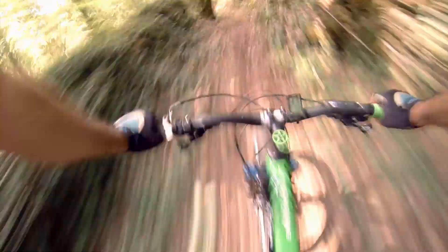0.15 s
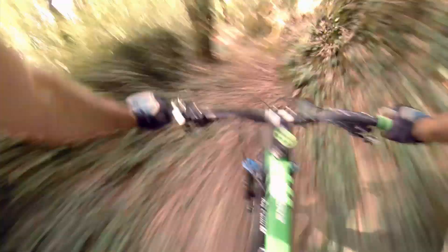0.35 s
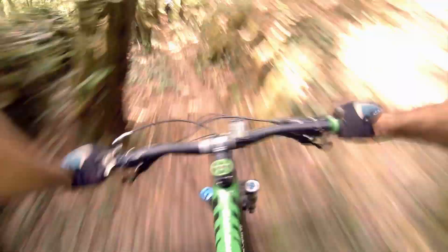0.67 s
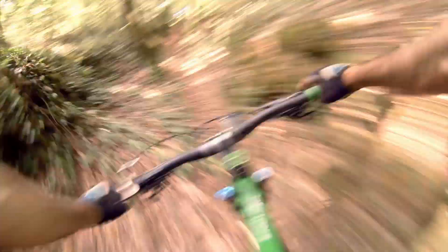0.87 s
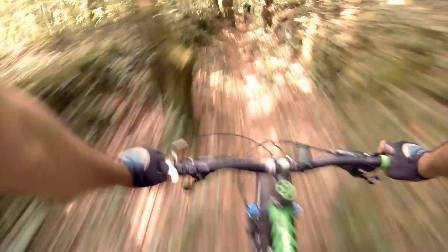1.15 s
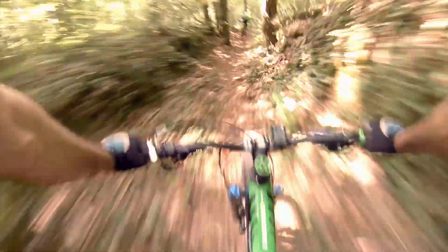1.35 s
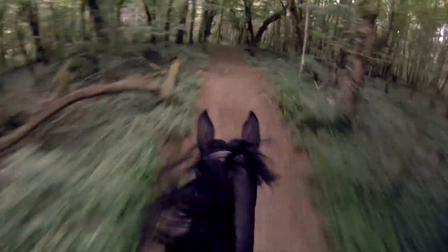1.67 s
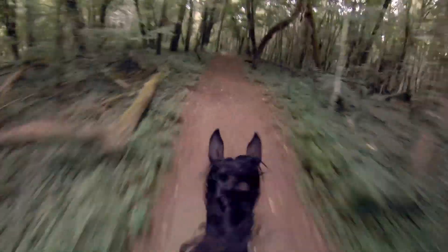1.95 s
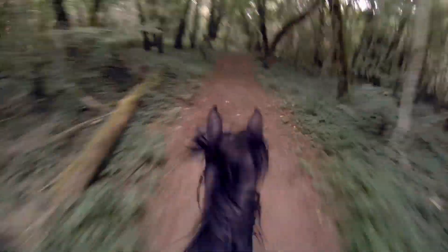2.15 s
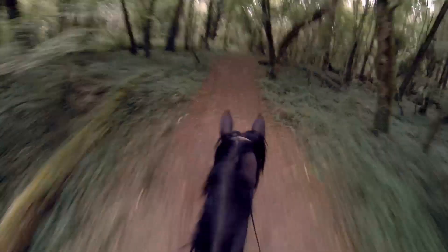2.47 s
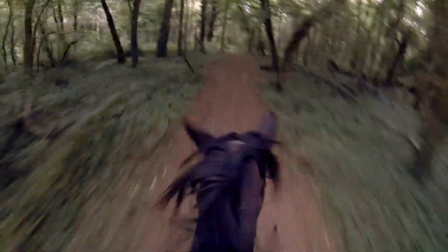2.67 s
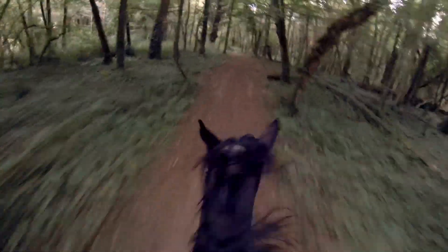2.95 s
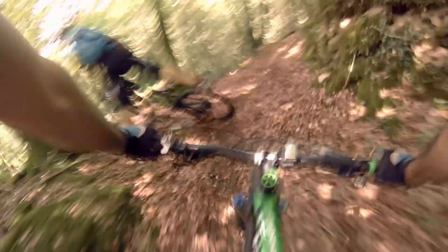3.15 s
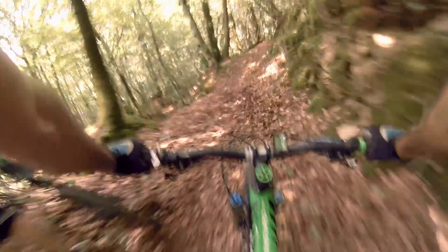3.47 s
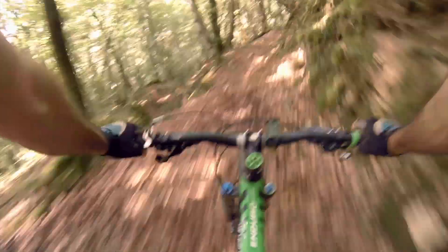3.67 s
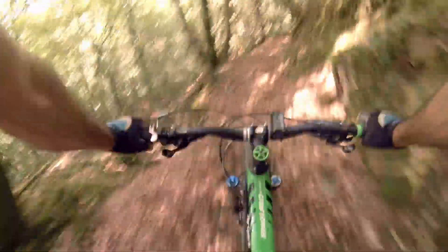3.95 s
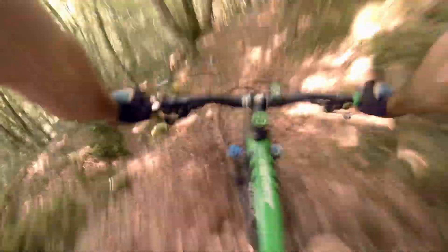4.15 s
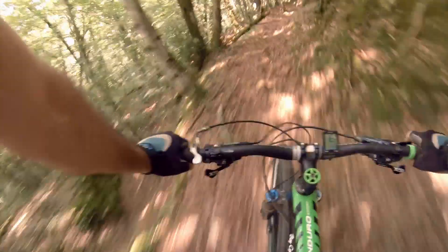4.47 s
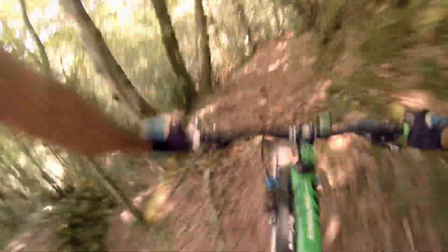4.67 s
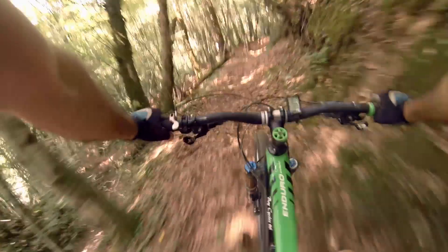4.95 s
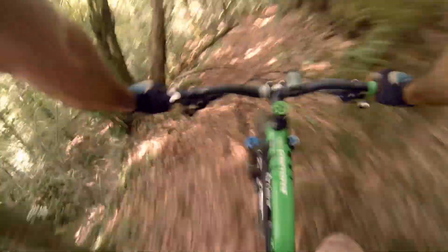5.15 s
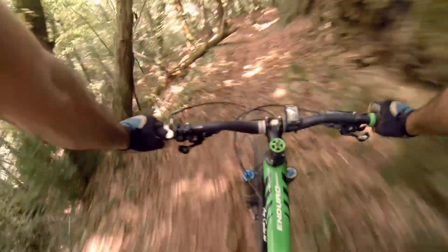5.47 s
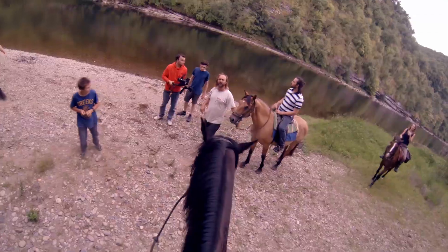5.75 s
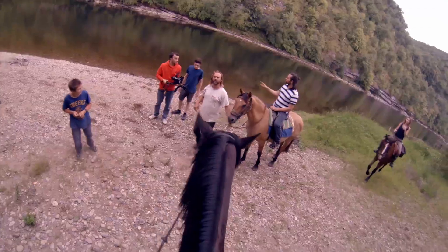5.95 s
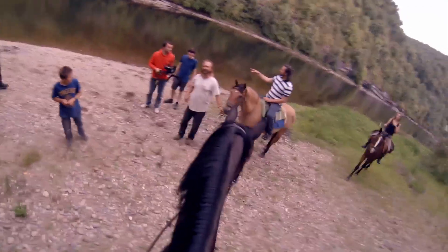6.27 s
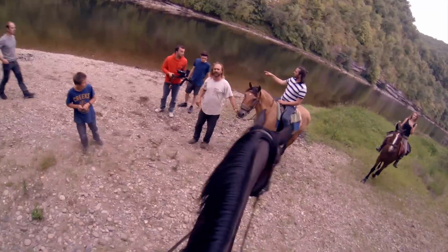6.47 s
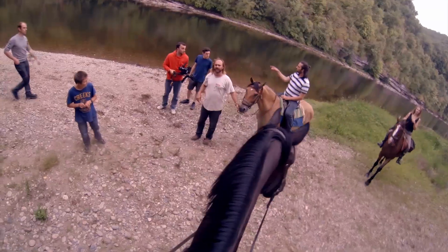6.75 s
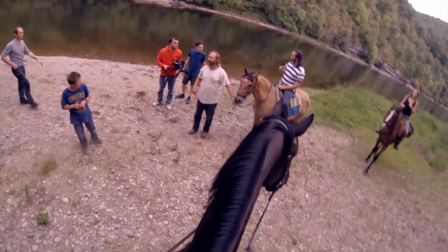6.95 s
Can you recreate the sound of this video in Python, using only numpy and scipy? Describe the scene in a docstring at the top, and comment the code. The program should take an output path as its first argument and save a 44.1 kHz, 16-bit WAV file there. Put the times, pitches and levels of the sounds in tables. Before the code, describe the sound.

Close, boxed-in microphone outdoors. Loud hollow plastic clacks and crunchy shaking over low rumble as a bike hits bumps; then a sudden change to muffled wind rush and soft thuds on a running horse; then another stretch of bike clatter and wind thumps. Everything stops abruptly, leaving faint hiss, small ticks and light scuffs while the horse stands still.

```python
"""Rough rides with a boxed camera

Down a rough trail on a bike, on a galloping horse, on the bike again, then on a horse standing still.
The camera knocks and scrapes in its sealed plastic housing: taps and gritty noise ring the housing's modes.
Shaped low noise at the microphone swells with wind buffets and dull bumps and rumbles with the ride; air rushes
at the gallop, jolts are damped low thumps, a brake gives very high sine squeaks, airy bursts and hiss are noise."""
import sys
import numpy as np
from scipy import signal
from scipy.fft import rfft, irfft
from scipy.io import wavfile
from scipy.ndimage import uniform_filter1d

SR = 44100
rng = np.random.default_rng(int(sys.argv[2]) if len(sys.argv) > 2 else 0)


def int16_out(signal):
    """Quantize to a 16-bit WAV file."""
    q = np.round(np.clip(np.atleast_2d(signal).T, -1, 1) * 32767)
    wavfile.write(sys.argv[1], SR, q.astype(np.int16))


N = 313551

# Noise of the microphone itself. Each row: frequency in Hz, relative spectrum in dB per Hz.
HISS_COLOUR = [(88, -32), (150, 5), (918, -5), (1460, -2), (1910, -10), (3150, -12.5), (8580, -20),
               (11700, -23), (15000, -43)]
HISS_DB = -63.5  # rms
# Steady low noise at the microphone: slow wind buffeting, a throb, and a lumpy rumble of the ride's vibration.
# Each row: time in seconds, then levels in dB of buffeting, throb, rumble.
LOW_NOISE = [(0.0, -20, -58, -29.5), (.8, -23.5, -43, -36.5), (1.54, -12, -32, -32), (1.6, -31, -32, -44.5),
             (1.9, -22.5, -36.5, -46), (2.26, -28, -34, -47), (2.7, -26.5, -39.5, -50.5),
             (3.35, -23.5, -50, -42.5), (3.72, -25.5, -46, -40), (3.85, -22, -38, -28.5),
             (4.5, -21, -38.5, -35.5), (4.9, -11.5, -45, -34.5), (5.13, -29, -44, -35),
             (5.4, -24, -46.5, -36.5), (5.6, -22.5, -48.5, -40), (5.66, -39, -50, -46.5),
             (5.74, -53, -57, -74), (5.92, -39.5, -46, -67), (6.44, -50.5, -50.5, -61.5),
             (6.63, -36, -39.5, -63), (6.89, -49, -50.5, -67.5), (7.11, -43, -41.5, -65)]
# Low swells: wind buffets and dull bumps of the ride.
# Each row: centre in seconds, then levels in dB of buffeting, throb, rumble.
LOW_SWELLS = [(0.058, -4, -15, -24.5), (.19, -5.5, -13, -25.5), (.24, -26, -13, -27), (.36, -27, -27, -28),
              (0.472, -11.5, -16, -30), (0.632, -18, -22, -26.5), (.69, -34, -25, -24),
              (0.811, -22, -17.5, -28), (.98, -13, -48, -33), (1.05, -35, -43, -27), (1.09, -14, -40, -41),
              (1.15, -27, -21, -33), (1.252, -6.5, -12, -31.5), (1.33, -24, -27, -22),
              (1.39, -16, -19, -48), (1.5, -13, -31, -28), (1.998, -8, -18, -40), (2.12, -19.5, -22.5, -57),
              (2.37, -18, -29, -38), (2.432, -11.5, -23.5, -54), (2.63, -35, -28, -46),
              (2.77, -29, -31, -55), (2.87, -22, -27, -54), (3.028, -33, -18, -53),
              (3.228, -22, -24.5, -33.5), (3.5, -22.5, -24, -34.5), (3.62, -38, -27.5, -34.5),
              (3.8, -24, -41, -37), (3.95, -24, -37, -28.5), (4.02, -13.5, -24, -31.5),
              (4.13, -16, -38, -33.5), (4.238, -10.5, -39, -21), (4.32, -30, -33, -30.5),
              (4.428, -12, -45, -32), (4.57, -25, -41, -49), (4.632, -9.5, -17, -21.5),
              (4.69, -10, -41, -30.5), (4.8, -14.5, -38, -26), (4.88, -13, -47, -26.5),
              (5.03, -33, -20, -27), (5.231, -12, -45, -26), (5.348, -10, -42, -31),
              (5.56, -11.5, -31, -31.5)]
# Time in seconds for a swell's power to fall to 1/e on either side: buffeting, throb, rumble.
SWELL_HALF_WIDTH_S = [0.029, 0.021, 0.026]
# Colours of the three low layers. Each row: frequency in Hz, relative spectrum in dB per Hz.
BUFFET_COLOUR = [(3.5, -13), (6.0, 4), (22, 2.5), (40, -13.5), (52, -35.5), (88, -120)]
THROB_COLOUR = [(24, -46), (40, 6.5), (65, -5), (85, -23.5), (110, -55), (190, -120)]
RUMBLE_COLOUR = [(50, -24), (85, 3), (135, 0), (269, -21.5), (361, -22), (454, -31), (600, -30.5),
                 (780, -52.5), (1320, -120)]

# Ringing modes of the housing. Each row: frequency in Hz, width in Hz, level in dB within its group.
HOUSING = [(831, 177, 29.5), (860, 240, -7), (1060, 390, -1.5), (1388.6, 75, 1), (1457.5, 119, 2),
           (1536, 90, -2.5), (2225, 182, 7), (2715, 220, 3.5), (3043, 255, 3.5), (3570, 220, -7),
           (3895, 240, -17), (4300, 230, -20), (4670, 224, 2), (5130, 140, 0), (5660, 240, -4.5),
           (6730, 170, -14), (7400, 670, -13.5), (8440, 900, 3), (10300, 910, 1), (11460, 1100, 0.5),
           (12000, 1400, -11.5), (13500, 760, -6.5)]
# Upper frequency limits in Hz of the lower, main, upper and top groups; the highest group lies above.
GROUP_TOPS_HZ = [1100, 1900, 4300, 8000]
# Steady shaking, one list for each bike ride and one for the standing horse.
# Each row: time in seconds, shaking level in dB.
SHAKING = [
    [(0.0, -27.5), (.136, -43.5), (.45, -36), (.622, -42), (.796, -38.5), (1.218, -36.5), (1.346, -27),
     (1.42, -38), (1.54, -33)],
    [(3.15, -46), (3.44, -50), (3.58, -38.5), (3.8, -50), (4.05, -38.5), (4.46, -39.5), (4.72, -44),
     (4.83, -37.5), (4.95, -41), (5.3, -41.5), (5.46, -45.5), (5.51, -38), (5.62, -46.5), (5.66, -51)],
    [(5.7, -67), (6.08, -65.5), (6.37, -68), (6.77, -60.5), (6.96, -67), (7.11, -69)],
]
# How shaking sounds in the lower, main, upper, top and highest modes:
# level in dB at a shaking of -40 dB, and dB of change for each dB of shaking.
SHAKE_DB = [-54, -39, -52, -63, -69.5]
SHAKE_FOLLOWS = [.9, 1, 0.87, 0.78, 0.85]
# Sharp knocks. Each row: start in seconds, nominal peak in dB of the main modes, lower modes in dB over them,
# upper modes in dB over them, pitch factor (held to 0.85-1.2), chatter level in dB over the peak.
KNOCKS = [(0.036, -12, -32, -9, 1.07, -10.5), (0.108, -16.5, -12, -9, 1.03, -13),
          (0.2277, -16, -17, -28, 0.98, -15), (0.2385, -12, -35, -16.5, 1.07, -29),
          (0.3678, -15.5, -34, -18, 0.97, -9), (0.4576, -9, -37, -24, 1.04, -6.5),
          (0.4982, -14.5, -36, -21, 1.05, -9.5), (.606, -4, -15, -11.5, 1.05, -12),
          (0.6122, -9, -30, -24, 1, -3), (0.6731, -8.5, -35, -29, 1.01, -9.5),
          (.717, -1, -18, -18, 1.02, -16.5), (.7966, -20, -32, -17, 1.07, -15),
          (.8734, -33, -21, -2, 1.16, -25), (1.047, -14.5, -32, -17, 0.96, -32),
          (1.1215, -12, -40, -21, 0.98, -13.5), (1.1818, -12.5, -23, -15.5, 1.03, -22),
          (1.287, -16.5, -28, -18, 0.96, -13), (1.3379, -4, -45, -17, 1, -27),
          (1.9863, -41.5, 4, 7, 1, -25), (2.442, -41, -6, -3, 1.04, -16),
          (3.0258, -34.5, -15, 5.5, 1.17, -27), (3.246, -4, -17.5, -8.5, 1.02, -26),
          (3.395, -14, -12.5, -7.5, 1, -13.5), (3.459, -11.5, -24, -18, 1.04, -11),
          (3.5355, -11, -11, -10.5, 1, -19), (3.774, -29, -6, -16, 1.22, -17),
          (3.8933, -14.5, -17, -17, 0.99, -11.5), (4.0165, -18, 0, -10, 0.96, -29),
          (4.0393, -21, 6, 6, 0.94, -4), (4.1763, -31, 8, -3, 1.12, -5), (4.2175, -9, -33, -18, 1.1, -9),
          (4.2815, -8.5, -28, -16.5, 1.01, -28), (4.3891, -11.5, -13.5, -9.5, 1.004, -12.5),
          (4.5424, -21.5, -8, -16.5, 1, -17), (4.6135, -11.5, -11.5, -9.5, 0.99, -14),
          (4.794, -18, -12, -11, 0.97, -29), (4.8989, -23, -6, -20, 0.99, -24),
          (5.02, -27.5, 3, -24, 0.98, -9), (5.247, -9, -32, -20, 0.98, -10.5),
          (5.2684, -12.5, -16, -24, 0.95, -32), (5.2999, -21.5, 4.5, -12, 0.92, -7),
          (5.5264, -11.5, -19, -6.5, 0.99, -35), (5.63, -7, -15, -9.5, 0.99, -31),
          (5.813, -46.5, -10, -5, 1.01, -9), (5.8294, -44.5, -8, 0, 0.95, -9),
          (5.9958, -50, -18, -3, 1.24, -14), (6.3215, -44, -2, -2, 1.03, -15.5),
          (6.6065, -39, -26, -9, 1.08, -15), (6.6664, -51, -17, -4, 1.19, -12),
          (6.702, -39.5, -23, -12, 1.17, -17), (6.815, -49, -26, -13, 1.25, -22),
          (6.907, -55, -22, 6, 1.1, -16.5)]
TOP_OVER_DB, HIGHEST_OVER_DB = -11, -22  # top and highest modes of a knock, over its upper modes
CHATTER_S, CHATTER_RISE_S = 0.011, 0.0027  # short rattle with every knock
CHATTER_LOWER_DB, CHATTER_UPPER_DB = -21, -15  # over the main modes
# Scrapes. Each row: start in seconds, rms level in dB of the main modes at full strength, length in seconds,
# upper modes in dB over the main modes, lower modes in dB over the main modes.
SCRAPES = [(0.049, -24.5, 0.019, -21, -21), (0.136, -22.5, 0.016, -18.5, -21.5),
           (0.162, -29, 0.034, -14, -15), (0.188, -35, 0.061, -9, -10), (0.364, -19, 0.03, -16.5, -33),
           (.525, -22, 0.0099, -16, -17), (0.64, -31.5, 0.02, -16, -1.5), (0.663, -15, 0.011, -17, -26),
           (.736, -23.5, 0.02, -16, -21), (0.81, -16, 0.022, -14, -27), (0.824, -13, 0.023, -11, -25),
           (0.94, -26.5, 0.012, -18, -14), (1.007, -36, 0.037, -7, -17), (1.063, -20.5, .012, -12, -21),
           (1.145, -29, 0.031, -6, -14), (1.21, -25, .011, -23, -24), (1.274, -19.5, 0.027, -25, -31),
           (1.329, -17.5, .031, -6, -36), (1.383, -15.5, 0.017, -6.5, -24.5),
           (1.473, -23.5, 0.026, -13, -15), (1.503, -16, 0.023, -8.5, -18),
           (3.145, -29.5, 0.028, -6.5, -16.5), (3.268, -24.5, 0.023, -18.5, -26),
           (3.339, -28.5, 0.022, -12.5, -25), (3.409, -23.5, 0.0066, -15, -8),
           (3.45, -19, 0.054, -17.5, -36), (3.513, -28, 0.072, -13, -26), (3.631, -30.5, 0.018, -25, -14),
           (3.69, -34, 0.036, -9.5, -16), (3.773, -26.5, 0.035, -12.5, -12),
           (3.816, -21.5, 0.04, -13.5, -25), (3.907, -15, 0.018, -14, -19), (3.94, -20, 0.044, -16.5, -22),
           (4.084, -32.5, 0.018, -13, -8), (4.173, -28, 0.034, -5, 1), (4.201, -17.5, 0.024, -16, -32),
           (4.247, -18.5, 0.012, -14.5, -28), (4.324, -22.5, 0.043, -17.5, -17),
           (4.476, -36.5, .018, -2.5, -4.5), (4.614, -31, 0.039, -9, -11), (4.747, -27, 0.063, -11, -18),
           (4.815, -29.5, 0.028, -10.5, -10.5), (4.874, -35, .015, -12, -11),
           (5.04, -22, 0.044, -17.5, -20), (5.168, -39, 0.071, -7, -16), (5.292, -33.5, 0.032, -7.5, -4),
           (5.8, -58, 0.14, -12, -13), (5.926, -57.5, 0.062, -12, -9), (5.987, -53, 0.055, -12, -18),
           (6.729, -52, 0.031, -15, -17), (6.898, -66.5, 0.044, -2, -10)]
RISE_SHARE = 0.64  # part of a scrape's length spent swelling
RUB_TOP_OVER_DB, RUB_HIGHEST_OVER_DB = -13.5, -38.5  # of scrapes and chatter, over their upper modes
# Broad crunch of the contact, between the modes. Each row: frequency in Hz, relative spectrum in dB per Hz.
GRIT_COLOUR = [(500, -41.5), (1900, -5.5), (3800, -4), (5000, -4.5), (6300, -12), (9000, -23.5),
               (14000, -36)]
GRIT_DB = -1  # over the strength of the top modes

# Brake squeaks. Each row: start in seconds, peak in dB before the flutter, frequency in Hz, length in seconds.
SQUEAKS = [(0.333, -69, 12200, 0.024), (0.472, -61, 12000, 0.025), (0.513, -64, 12000, 0.013),
           (0.651, -54.5, 12000, .02), (5.565, -37.5, 12020, 0.025), (5.583, -50, 12150, 0.024),
           (5.606, -63, 12200, 0.015), (5.69, -70, 12050, 0.013)]
# Dull jolts through the mount. Each row: start in seconds, level in dB before rise and decay,
# frequency in Hz, time in seconds to decay by 60 dB.
JOLTS = [(0.349, -15, 111, 0.15), (0.632, 2, 91, 0.02), (0.797, -18, 81.6, 0.11), (1.491, -14, 107, 0.21),
         (1.987, -13, 363, 0.0096), (2.3, -37, 454, 0.037), (2.346, -24, 396, 0.014),
         (2.444, -32, 337, 0.033), (3.89, -24, 280, 0.021), (4.014, -12, 128, 0.12), (4.069, -14, 145, 0.1),
         (4.452, -30, 420, .012), (4.633, -23, 112, 0.17), (4.9, -2, 138, 0.018), (5.019, -2.5, 122, 0.064),
         (5.298, -17, 326, 0.014)]
# Short airy bursts: swishes, and the bright noisy edge of two clicks. Each row: start in seconds,
# rms level in dB before rise and decay, time in seconds for the decay to take the power to 1/e.
AIRY_BURSTS = [(.872, -45, 0.0088), (1.978, -57, 0.043), (3.023, -59.5, 0.061), (5.267, -45, 0.005),
               (6.316, -67, .028), (6.67, -73, .03), (6.96, -76.5, 0.027)]
BURST_RISE_S = 0.0016
# Colour of the airy bursts. Each row: frequency in Hz, relative spectrum in dB per Hz.
BURST_COLOUR = [(2000, -36.5), (4500, 0), (6500, -2.5), (8000, -1.5), (10000, -11.5), (13000, -13),
                (15000, -30.5)]
# Smooth rush of air at the gallop. Each row: time in seconds, level in dB.
RUSH = [(1.56, -42), (1.884, -43.5), (2.918, -47), (3.14, -46.5)]
# Colour of the rush. Each row: frequency in Hz, relative spectrum in dB per Hz.
RUSH_COLOUR = [(88, -36.5), (150, 1.5), (442, -9.5), (640, -15), (956, -17.5), (1220, -2.5), (1380, 2),
               (1970, -15), (3190, -22.5), (3660, -32), (6000, -41.5), (7800, -73.5), (13200, -120)]
EDGE_HZ = 14900  # upper band limit


def gain_of(db):
    """Decibels to gain."""
    return 10 ** (np.asarray(db) / 20)


def evened(x):
    """Scales to rms 1."""
    return x / np.sqrt(np.mean(x ** 2) + 1e-20)


def add(mix, s, sound):
    """Adds a sound at a time in seconds."""
    part = mix[..., max(round(s * SR), 0):][..., :sound.shape[-1]]
    part += sound[..., :part.shape[-1]]


def curves(rows):
    """Columns of a curve table, one value a sample, straight lines between rows."""
    s, *columns = np.transpose(rows)
    return np.array([np.interp(np.arange(N) / SR, s, c) for c in columns])


def coloured(points):
    """Noise of rms 1 with the given spectrum."""
    f, db = np.transpose(points)
    hz = np.fft.rfftfreq(N, 1 / SR)
    spectrum_db = np.interp(np.log(hz + 1), np.log(f + 1), db)
    return evened(irfft(rfft(rng.standard_normal(N)) * gain_of(spectrum_db), N))


def flicker(seconds, depth_db):
    """A gain of rms 1 that wanders at random over the given time, by the given rms depth."""
    size = max(round(seconds * SR), 1)
    slow = evened(uniform_filter1d(uniform_filter1d(rng.standard_normal(N), size), size))
    return evened(gain_of(depth_db * slow))


def steadied(x, size):
    """Mostly evens out the chance swells of a noise, leaving its strength to the tables."""
    return evened(x / (uniform_filter1d(x ** 2, size) + .05) ** .45)


def hiss():
    """Steady faint noise of the microphone."""
    return gain_of(HISS_DB) * coloured(HISS_COLOUR)


def low_strengths():
    """Strength of buffeting, throb and rumble: the steady level plus a bell-shaped rise for each swell."""
    power = gain_of(curves(LOW_NOISE)) ** 2
    t = np.arange(-4000, 4000) / SR
    bell = np.exp(-(t / np.c_[SWELL_HALF_WIDTH_S]) ** 2)
    for s, *levels_db in LOW_SWELLS:
        early = max(round((-t[0] - s) * SR), 0)  # samples of the swell before the start of the sound
        swell = gain_of(np.c_[levels_db]) ** 2 * bell
        add(power, s + t[0], swell[:, early:])
    return np.sqrt(power)


def low_noise():
    """Slow pressure swings of wind buffeting, a throb, and a lumpy rumble of the ride's vibration."""
    buffet, throb, rumble = low_strengths()
    low = buffet * steadied(coloured(BUFFET_COLOUR), size=4000)
    low += throb * steadied(coloured(THROB_COLOUR), size=2000)
    return low + rumble * coloured(RUMBLE_COLOUR) * flicker(0.01, 2.64)


def rings(pitch=1):
    """Response of each mode to one tap, and its group number from lower (0) to highest (4)."""
    hz, width, db = np.transpose(HOUSING)[:, :, None]
    t = np.arange(1400) / SR
    x = np.pi * width * t
    swell_and_decay = x * np.exp(-1.6 * x)  # swelling first gives the mode steep flanks
    ring = gain_of(db) * width * swell_and_decay * np.sin(2 * np.pi * hz * pitch * t)
    return ring, np.searchsorted(GROUP_TOPS_HZ, hz[:, 0])


def rubbing():
    """Strength of the gritty contact in shaking, scrapes and knock chatter, one row a mode group."""
    first, second, still = SHAKING
    pause = [(s, -120) for s in (first[-1][0] + .02, second[0][0] - .02)]  # no shaking at the gallop
    over_reference_db = curves(np.concatenate([first, pause, second, still])) + 40
    shake_db = np.c_[SHAKE_DB] + np.c_[SHAKE_FOLLOWS] * over_reference_db
    power = gain_of(shake_db) ** 2 * flicker(0.039, 0.5) ** 2
    t = np.arange(6000) / SR
    strokes = [(s, db, RISE_SHARE * length, length, upper_db, lower_db)
               for s, db, length, upper_db, lower_db in SCRAPES]
    strokes += [(s, peak_db + chatter_db, CHATTER_RISE_S, CHATTER_S, CHATTER_UPPER_DB, CHATTER_LOWER_DB)
                for s, peak_db, _, _, _, chatter_db in KNOCKS]
    for s, db, rise, length, upper_db, lower_db in strokes:
        stroke = np.minimum(t / rise, 1) / (1 + (t / length) ** 10)  # flat top, quick stop
        top_db, highest_db = upper_db + RUB_TOP_OVER_DB, upper_db + RUB_HIGHEST_OVER_DB
        groups_db = np.c_[[lower_db, 0, upper_db, top_db, highest_db]]
        add(power, s, gain_of(db + groups_db) ** 2 * stroke)
    return np.sqrt(power) * flicker(.0012, 2.8)  # the contact sticks and slips


def knocking():
    """A tap with a fading tail of weaker taps; where it lands sets its pitch and the share of each mode."""
    out, t = np.zeros(N), np.arange(300) / SR
    for s, db, lower_db, upper_db, pitch, _ in KNOCKS:
        ring, group = rings(np.clip(pitch, .85, 1.2))
        group_peak = np.array([abs(ring[group == k].sum(axis=0)).max() for k in range(5)])
        top_db, highest_db = upper_db + TOP_OVER_DB, upper_db + HIGHEST_OVER_DB
        blow = gain_of(db + np.array([lower_db, 0, upper_db, top_db, highest_db])) / group_peak
        tap = 0.046 * rng.standard_normal(len(t)) * np.exp(-t / 0.0036)
        tap[0] += 1  # the main tap
        mode_gain = blow[group] * gain_of(0.53 * rng.standard_normal(len(HOUSING)))
        add(out, s, np.convolve(tap, mode_gain @ ring))
    return out


def housing():
    """Knocks, crunch and rubbed modes; the contact point wanders, so each mode is rubbed now more, now less."""
    ring, group = rings()
    rub, out = rubbing(), knocking()
    top = rub[3]
    out += gain_of(GRIT_DB) * top * coloured(GRIT_COLOUR)
    for mode, k in zip(ring, group):
        contact = rub[k] * rng.standard_normal(N) * flicker(0.021, 3.3)
        drive = contact / np.linalg.norm(ring[group == k])  # the whole group gets the strength of the rub
        out += signal.oaconvolve(drive, mode)[:N]
    return out


def brake():
    """Short sine squeaks that flutter in strength and pitch."""
    out, waver = np.zeros(N), flicker(.004, .03)
    for s, db, hz, length in SQUEAKS:
        pitch = waver[round(s * SR):][:round(length * SR)]
        tone = np.sin(2 * np.pi * hz * np.cumsum(pitch) / SR)
        add(out, s, gain_of(db) * signal.windows.tukey(len(pitch), .6) * tone)
    return out * flicker(0.0019, 3.5)


def jolts():
    """Damped low thumps with a sudden start, each a decaying cosine."""
    out, t = np.zeros(N), np.arange(4000) / SR
    for s, db, hz, t60 in JOLTS:
        envelope = gain_of(db - 60 * t / t60) * np.minimum(t / 0.0027, 1)  # rises in 2.7 ms
        add(out, s, envelope * np.cos(2 * np.pi * hz * t))
    return out


def airy_bursts():
    """Swishes and the bright edges of clicks: shaped noise that starts almost at once and dies away."""
    power, t = np.zeros(N), np.arange(8000) / SR
    for s, db, length in AIRY_BURSTS:
        burst = np.minimum(t / BURST_RISE_S, 1) * np.exp(-(t / length) ** 2)
        add(power, s, gain_of(db) ** 2 * burst)
    return np.sqrt(power) * coloured(BURST_COLOUR) * flicker(.002, 3.2)


def rush():
    """Smooth rush of air at the gallop: gently flickering noise, faded in and out over 20 ms."""
    before, after = (RUSH[0][0] - .02, -99), (RUSH[-1][0] + .02, -99)
    level_db = curves([before] + RUSH + [after])[0]
    return gain_of(level_db) * coloured(RUSH_COLOUR) * flicker(.03, 1.5)


def scene():
    """All sources at one microphone, over its own hiss."""
    return (hiss() + low_noise() + housing() + brake() + jolts() + airy_bursts() + rush())[None]


def record(dry):
    """Peaks are softly rounded; then the band limit."""
    rounded = .98 * np.tanh(dry / .98)
    band_limit = signal.firwin(255, EDGE_HZ, window=("kaiser", 9), fs=SR)
    return signal.oaconvolve(rounded, band_limit[None], "same")


dry = scene()
out = record(dry)
int16_out(out)
```